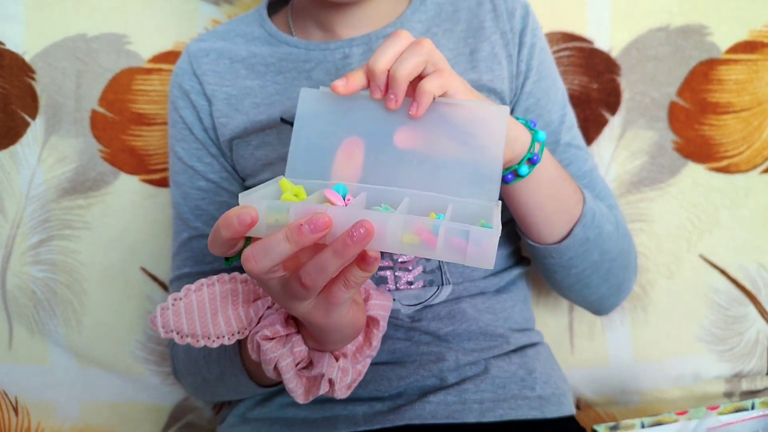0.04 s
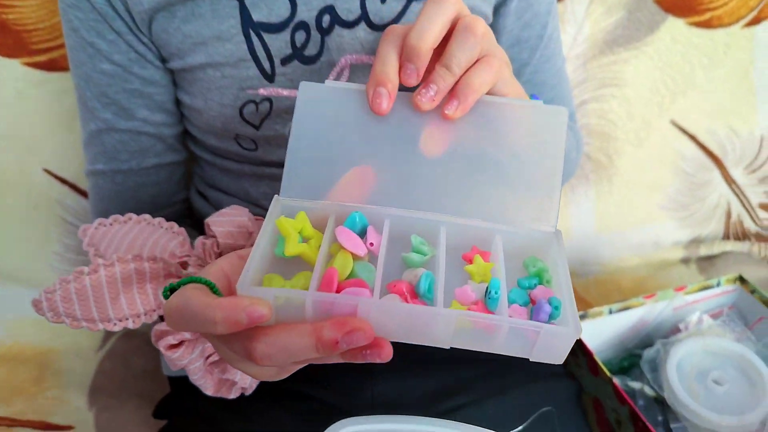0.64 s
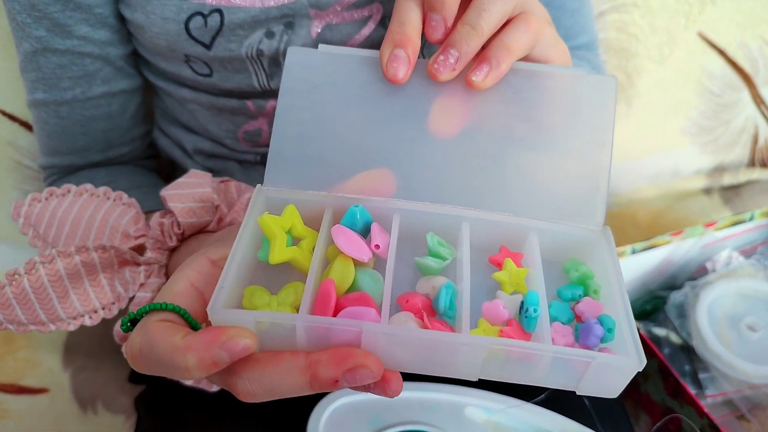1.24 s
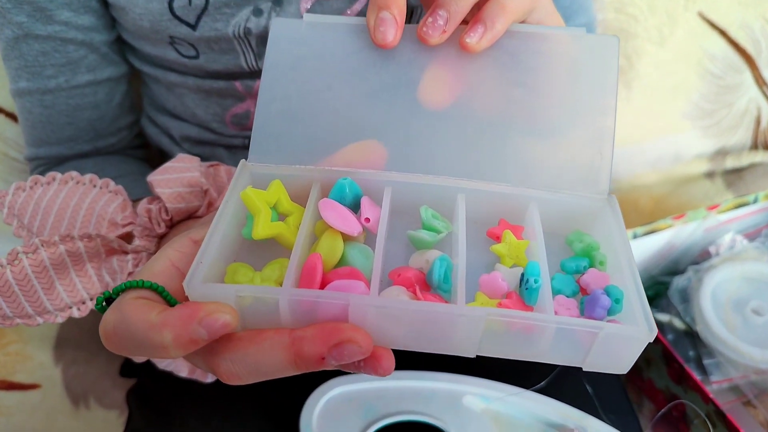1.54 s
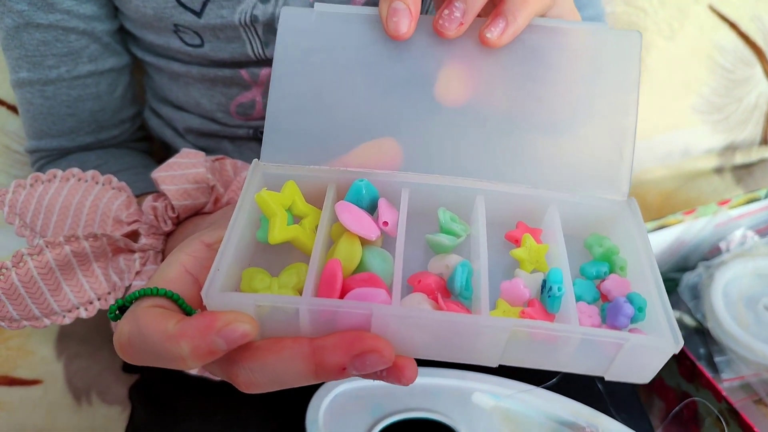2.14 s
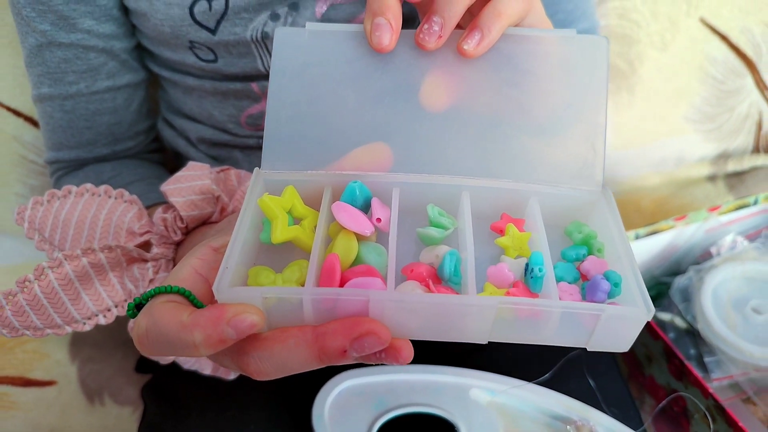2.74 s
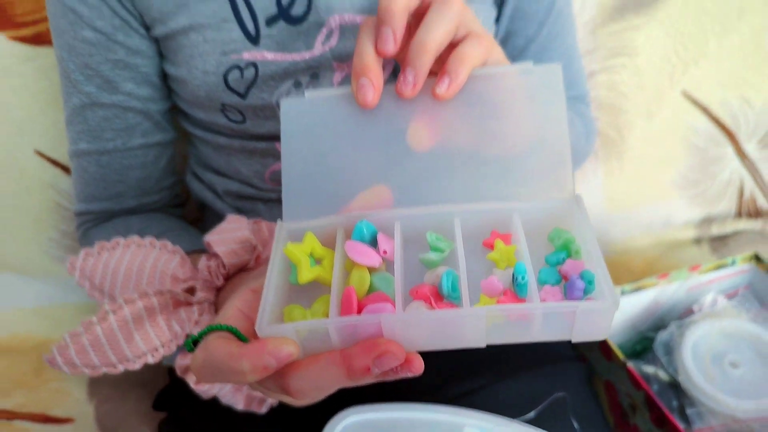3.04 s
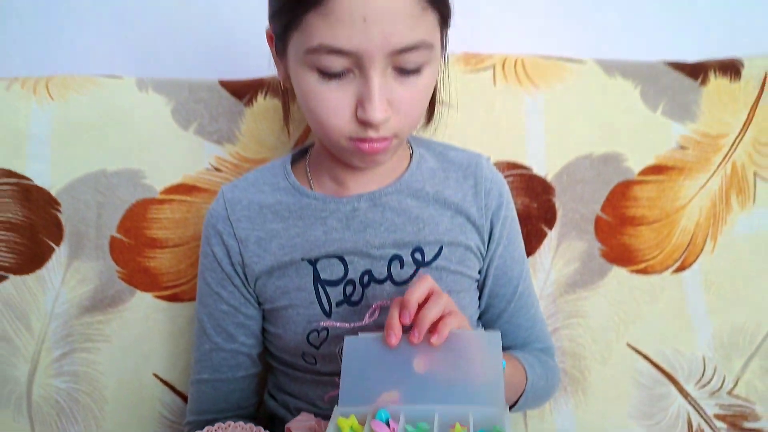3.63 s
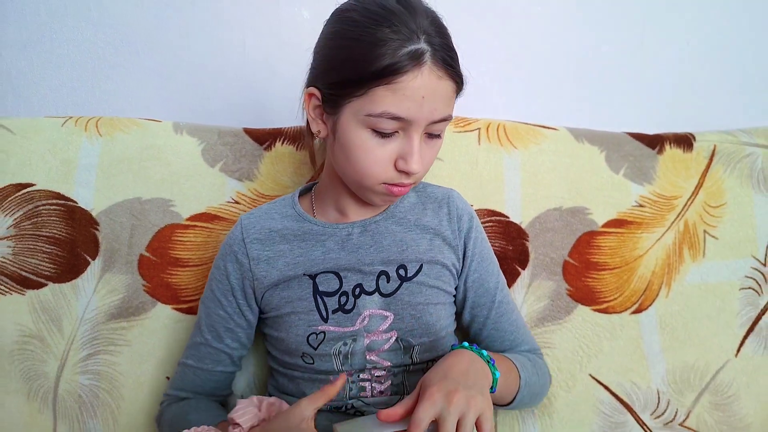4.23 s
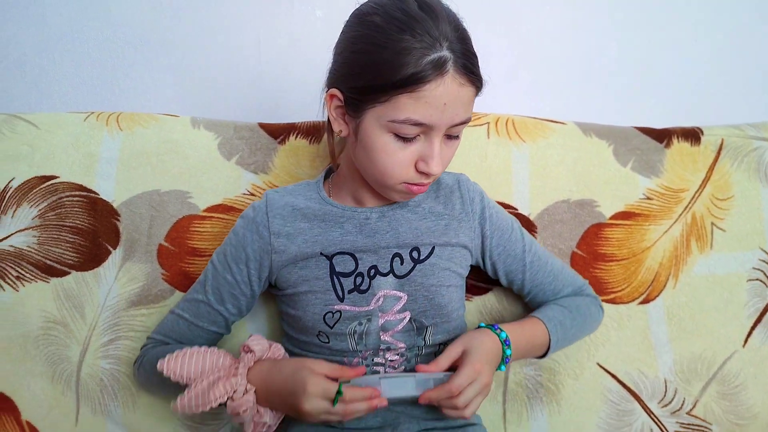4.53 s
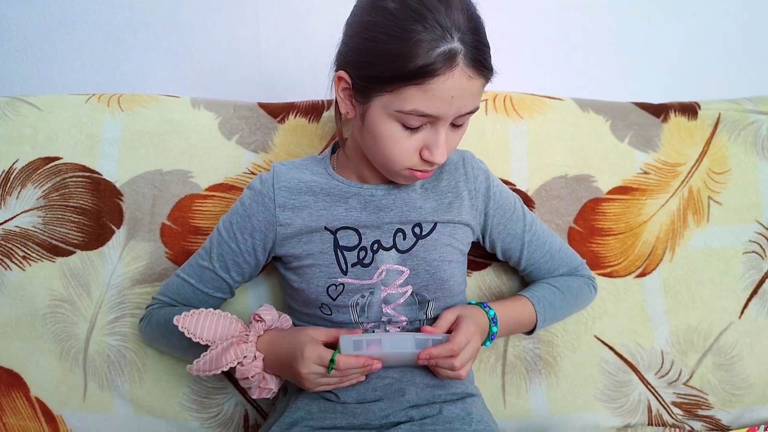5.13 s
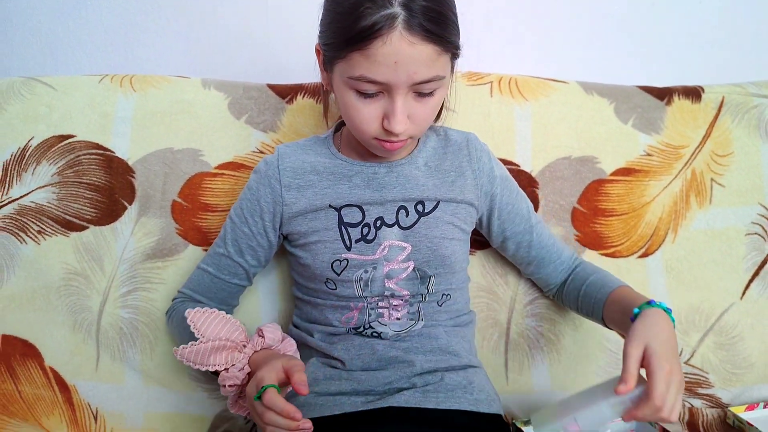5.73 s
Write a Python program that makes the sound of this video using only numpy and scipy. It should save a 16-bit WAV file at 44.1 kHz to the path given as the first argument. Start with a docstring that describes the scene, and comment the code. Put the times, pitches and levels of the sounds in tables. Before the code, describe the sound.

In a small quiet room, fingers tap lightly on a thin plastic box and softly bump the close, hand-held microphone. After a lull, beads click inside while hands and sleeves rub over the plastic. The lid knocks down and the catch shuts with a sharp snap, the loudest sound. A few hollow knocks, rustles and bead clicks follow, with a short bright echo over a faint hum.

```python
"""Bead box in a small quiet room

Close to a hand-held stereo microphone, a child shows a thin plastic compartment box of beads,
then closes it on her lap. Beads and fingernails tick on the shell, hands and sleeves slide over it,
the lid knocks down, its catch snaps shut and the box is swung aside. Fingers bump the microphone
early on. The room's walls give a short bright echo over a faint hum."""
import sys
import numpy as np
from scipy import signal
from scipy.fft import rfft, irfft
from scipy.io import wavfile
from scipy.ndimage import uniform_filter1d

SR = 44100
rng = np.random.default_rng(int(sys.argv[2]) if len(sys.argv) > 2 else 0)


def unload_wav(signal):
    """Save mono or channel-first audio to the path in sys.argv[1] as 16-bit WAV at rate SR, clipped to [-1, 1]."""
    wavfile.write(
        sys.argv[1],
        SR,
        np.round(np.clip(np.atleast_2d(signal).T, -1, 1) * 32767).astype(np.int16),
    )


N = 254757
TIME = np.arange(N) / SR

# the catch's snap: (time [s], level [dB], body re click [dB], pitch [Hz], left minus right [dB])
CATCH_SNAPS = [(4.8071, -12.5, -27.5, 4000, -4.5), (4.8089, -6, 0, 7400, 2),
               (4.8096, -12, -12.5, 2274, -10)]
def catch_snap():
    """The catch slips over its ridge, slams home and rebounds: the loudest thing at the microphone."""
    return box_contacts([(*row, 1) for row in CATCH_SNAPS], rise_s=.0001, crack_t60=.012, reach=1.7,
                        ring_db=-4.5, spot_db=-12.5, edge_db=2.5,
                        body_db=-4.5, body_band_hz=(200, 2000), gain_db=-26.5)


# knocks: (time [s], level [dB], body re click [dB], pitch [Hz], grip's shift of body modes [ratio])
LID_KNOCKS = [(4.6073, -28.5, 1.5, 1400, 1.2), (4.6416, -21.5, 2, 3250, 1.035),
              (5.060, -49, 0.5, 1770, .85), (5.101, -47, 3.5, 1500, 0.86), (5.160, -51.5, 9, 1500, 0.71),
              (5.4485, -52.5, 10, 1330, 0.76), (5.458, -49, 5.5, 1500, .85),
              (5.498, -37.5, -1.5, 1330, 0.94), (5.5035, -29, -2, 1500, 0.94),
              (5.517, -44.5, 6, 1500, 0.96), (5.529, -35.5, -2.5, 2130, 0.98)]
def lid_knocks():
    """The lid is pressed onto the tray, then the hand knocks the shut box, a little to the right."""
    rows = [(s, db, hollow_db, hz, -3, grip) for s, db, hollow_db, hz, grip in LID_KNOCKS]
    return box_contacts(rows, rise_s=.00083, crack_t60=.019, reach=2.02,
                        ring_db=-2, spot_db=-4.5, edge_db=-10,
                        body_db=3.5, body_band_hz=(560, 935), gain_db=-27)


# beads colliding: (time [s], level [dB], pitch [Hz])
BEAD_CLICKS = [(3.3513, -36, 6600), (3.3914, -36, 2720), (3.4156, -27, 5500), (3.495, -43, 4230),
               (3.5756, -44, 4000), (3.6072, -44, 3400), (3.659, -40.5, 5160), (3.684, -37, 4860),
               (3.7178, -34.5, 4300), (3.7696, -35.5, 3350), (3.8363, -37, 3550), (3.8900, -29, 5500),
               (3.9663, -44.5, 4800), (4.0639, -28.5, 7100), (4.1086, -27.5, 3850), (4.1599, -34.5, 1800),
               (4.297, -36.5, 1890), (4.363, -40.5, 2050), (5.0909, -45, 2800), (5.1415, -40.5, 3800),
               (5.1582, -36, 3970), (5.431, -48, 3310), (5.5963, -33, 2230), (5.6535, -32.5, 3000)]
def bead_clicks(hollow_db=-23, pan_db=-2.5):
    """Beads click against each other and the dividers, barely sounding the hollow body."""
    rows = [(s, db, hollow_db, hz, pan_db, 1) for s, db, hz in BEAD_CLICKS]
    return box_contacts(rows, rise_s=.00033, crack_t60=.028, reach=1.78,
                        ring_db=-1.5, spot_db=-5, edge_db=-6,
                        body_db=4.5, body_band_hz=(340, 1500), gain_db=-25.5)


# taps on the shell: (time [s], level [dB], body re click [dB], pitch [Hz], left minus right [dB])
FINGER_TAPS = [(0.0397, -45, -7, 3600, -4), (0.052, -52.5, 3, 2030, -8), (0.0816, -43.5, -3.5, 2300, 0),
               (0.0997, -30, -18, 2000, -2), (0.1170, -41.5, -12, 2520, -5), (0.199, -49, -20, 4000, -5),
               (0.2830, -51.5, -10, 2620, -5), (0.4797, -52.5, -2.5, 2580, -5),
               (0.7949, -47.5, 0.5, 1710, -1), (0.815, -51, 0.5, 1570, -9), (0.833, -52.5, -18, 2800, -5),
               (0.9053, -53.5, 3, 1620, -3), (1.235, -57.5, 2.5, 1340, 0), (3.1382, -58, -10, 1820, 4),
               (3.308, -46.5, -7.5, 2780, 0), (3.3249, -42, -32, 1440, 1), (4.0292, -46, -32, 1490, -2)]
def finger_taps():
    """Fingers and nails tap the open box near the microphone."""
    return box_contacts([(*row, 1) for row in FINGER_TAPS], rise_s=.0005, crack_t60=.027, reach=2.14,
                        ring_db=-4, spot_db=-1.5, edge_db=-4,
                        body_db=-1, body_band_hz=(348, 1500), gain_db=-24.5)


# low modes of the hollow box: (frequency [Hz], t60 [s], level [dB])
BODY_MODES = [(283, 0.011, -2), (564, 0.099, -12.5), (665, 0.016, 7.5), (883, 0.017, 17),
              (1020, 0.045, -10.5), (1350, 0.072, 0.5)]
# modes of its thin walls: (frequency [Hz], width [Hz], level [dB])
WALL_MODES = [(2300, 220, -5), (3360, 84, -14.5), (4070, 570, -5), (4610, 120, 3), (5550, 110, -29),
              (5740, 140, -18), (7300, 190, 11.5), (8960, 130, -10)]
# spectrum of a plastic crack, with the microphone's bright presence peak: (frequency [Hz], level [dB])
CRACK_AT_MIC = [(200, -11), (900, -16), (1700, -0.5), (2300, -3.5), (2900, -3), (4000, 0), (5600, 0),
                (6500, 2), (7300, 9), (8300, -0.5), (10500, -5), (14000, -4)]
def box_contacts(rows, rise_s, crack_t60, reach, ring_db, spot_db, edge_db,
                 body_db, body_band_hz, gain_db, size=4096):
    """Contacts crack and ring the box's walls and body; returns the paths to microphone and room."""
    paths = np.zeros((2, 2, N + size))
    t = np.arange(size) / SR
    contact = (1 - np.exp(-t / rise_s)) * fade(t, crack_t60)
    hand_damping = fade(t, .012)
    impulse = np.ones((2, 1)) * (t == 0)
    scattered = unit(colour(impulse, CRACK_AT_MIC))  # over all directions, the wall peaks even out
    for s, db, hollow_db, hz, pan_db, grip in rows:
        detune = 1 + .02 * rng.standard_normal()
        walls = sum(undb(mode_db) * np.exp(-np.pi * width * t)
                    * np.sin(2 * np.pi * (f * detune * t + rng.random()))
                    for f, width, mode_db in WALL_MODES)
        burst = unit(colour(alike(noise(size), .45) * contact, CRACK_AT_MIC))
        direct = burst + undb(ring_db) * unit(walls * hand_damping)
        spot = unit(np.sin(2 * np.pi * hz * t) * np.exp(-hz * t / 2.7))  # the struck spot rings briefly
        body = sum(undb(mode_db) * fade(t, t60) * np.sin(2 * np.pi * f * grip * detune * t)
                   for f, t60, mode_db in BODY_MODES)
        body = highpass(body, body_band_hz[0], order=4)  # a small box radiates little bass
        body = undb(hollow_db + body_db) * unit(lowpass(body, body_band_hz[1]))
        start = int(s * SR)
        for path, crack in zip(paths, (direct, scattered)):
            # a harder, shorter contact shifts the click upwards; a thin sharp edge is always there
            click = unit(highpass(lowpass(crack, reach * hz), .4 * hz))
            edge = highpass(undb(edge_db) * crack + undb(spot_db) * spot, hz / 4)
            hit = panned(pan_db) * unit(click + edge) + body
            path[:, start:start + size] += undb(db + gain_db) * hit
    return paths[:, :, :N]


# spectra of the bright friction and the dull scrape: (frequency [Hz], level [dB])
HISS_SPECTRUM = [(240, -52), (400, -31.5), (793, -25), (842, -4), (1100, -8), (1640, -12), (1800, -10.5),
                 (2420, -6), (3670, 2), (4130, -0.5), (4940, 0.5), (6000, -5), (7280, 2.5), (9650, -30),
                 (14000, -19)]
SCRAPE_SPECTRUM = [(250, -20), (700, -5.5), (1500, -7), (2300, -9), (3500, -10), (7000, -36)]
def hand_slides(lid_from_s=4.02, lid_shut_s=4.6):
    """Skin and sleeve rub the box in dense tiny slips, with small clinks and a duller scrape beneath."""
    level, scrape_level = stroke_levels()
    friction = unit(slips(rate=3700, spread_db=6.5) * undb(2 * wander(140)))
    # each small contact rings briefly at a pitch of its own
    clinks = unit(sum(signal.lfilter(*signal.iirpeak(hz, 16, fs=SR), slips(rate=160, spread_db=3))
                      for hz in np.geomspace(1400, 12000, 24)))
    hiss = unit(colour(friction + undb(4) * clinks, HISS_SPECTRUM)) * panned(-4)
    force = level / undb(-43)  # 1 in a firm slide; the fine sizzle grows faster than the rest
    sizzle = undb(-52) * unit(highpass(clinks, 8500, order=4)) * force ** 1.6
    scrape = undb(-3) * unit(colour(slips(rate=2700, spread_db=3), SCRAPE_SPECTRUM))
    # while the lid is lowered the scrape sounds through the gap under it
    closing = (TIME > lid_from_s) & (TIME < lid_shut_s)
    scrape = np.where(closing, lid_gap() + undb(-5.5) * scrape, scrape)
    return level * hiss + sizzle + scrape_level * scrape


# strokes over the box: (start [s], swell [s], hold [s], level [dB], scrape re stroke [dB])
HAND_STROKES = [(0.114, 0.011, 0.21, -73.5, 7), (3.338, 0.064, 0.012, -47, -12.5),
                (3.443, 0.013, 0.18, -68, -3.5), (3.705, 0.011, 0.095, -52, -8),
                (3.875, 0.0089, 0.0034, -50, -7), (3.954, 0.029, 0.077, -71.5, -3),
                (4.043, 0.005, 0.0093, -49, -10.5), (4.059, 0.0046, 0.11, -45, -9.5),
                (4.199, 0.027, 0.047, -53, -10), (4.42, .016, 0.022, -48, -7.5), (4.507, .025, .02, -67, 5),
                (5.134, 0.018, 0.0087, -63.5, 6), (5.446, 0.0091, 0.028, -67.5, 5.5),
                (5.495, 0.0089, 0.036, -50.5, 1.5), (5.586, 0.0054, 0.028, -50, -5),
                (5.624, 0.013, 0.17, -50, -4)]
def stroke_levels(swell_db=16.5, sag_db_per_s=46.5, release_db_per_s=262):
    """Levels of the slide and its scrape: each stroke swells, sags as the hand slows and dies away."""
    level, scrape_level = np.zeros((2, N))
    for start, swell_s, hold_s, db, scrape_db in HAND_STROKES:
        t = TIME - start - swell_s
        swell = swell_db * np.minimum(t / swell_s, 0)
        sag = sag_db_per_s * np.clip(t, 0, hold_s)
        release = release_db_per_s * np.maximum(t - hold_s, 0)
        stroke = undb(db + swell - sag - release) * (TIME >= start)
        level += stroke
        scrape_level += undb(scrape_db) * stroke
    return level, scrape_level


def slips(rate, spread_db):
    """Friction's random impulses, about `rate` a second, mostly small with a few large ones."""
    sizes = undb(spread_db * np.minimum(rng.exponential(size=N), 3.5))
    return alike(noise() * (rng.random(N) < rate / SR) * sizes, .43)


def lid_gap(wide_hz=1475, narrow_hz=1078, mid_fall_s=4.118):
    """Two unevenly stirred air resonances under the lid fall together as the gap narrows."""
    openness = (1 - np.tanh((TIME - mid_fall_s) / .036)) / 2
    hz = (narrow_hz + (wide_hz - narrow_hz) * openness) * (1 + .04 * wander(30))
    cavity = narrow_noise(hz, width_hz=250) * undb(4.3 * wander(45))
    overtone = narrow_noise(1.68 * hz, width_hz=170) * undb(2.5 * wander(41))
    return undb(-2.5) * (cavity + undb(-2) * overtone)


# housing taps: (time [s], level [dB], push width [s], click re push [dB], left minus right [dB])
MIC_BUMPS = [(0.0794, -45, 0.00024, -16, -8), (0.2083, -45, 0.00066, -24, -30),
             (0.2287, -29, 0.0005, -17, -28), (0.578, -40.5, 0.0003, -8, -22),
             (1.0182, -49.5, 0.00017, 2, 8)]
# spectrum of the housing's click: (frequency [Hz], level [dB])
HOUSING_SPECTRUM = [(300, -7.5), (900, 3), (1450, 0), (3500, -11.5), (8000, -19), (14000, -41)]
def microphone_bumps():
    """A finger taps the microphone housing: one soft push with a slow undershoot, and a dry click."""
    pushes, click_level = np.zeros((2, 2, N))
    for s, db, push_s, click_db, pan_db in MIC_BUMPS:
        t = TIME - s
        gains = undb(db) * panned(pan_db)
        pushes += gains * np.exp(-(t / push_s) ** 2)
        click_level += gains * undb(click_db) * fade(np.abs(t), t60=.012) * (t > 0)
    housing = unit(colour(alike(noise(), .45), HOUSING_SPECTRUM))
    return highpass(pushes, 40) + click_level * housing


# feed to the room, least while the box is close to the microphone: (time [s], level [dB])
ROOM_FEED = [(.1, 0), (.55, -1.5), (3.0, 0), (3.5, 0), (5.78, 3.5)]
# colour of the echo: (frequency [Hz], level [dB])
ECHO_SPECTRUM = [(100, -18), (300, -0.5), (800, -3.5), (1700, 3), (3000, 5), (7500, -4.5), (14000, -2.5)]
def room_echo(x, t60=.29, treble_t60=.25, gap_s=.0051, size=22050):
    """The near walls answer after a short gap with a diffuse tail whose treble dies first."""
    feed = x * undb(np.interp(TIME, *np.transpose(ROOM_FEED)))
    t = np.arange(size) / SR
    low = colour(alike(noise(size), .53), [(1500, 2.5), (5000, -7)]) * fade(t, t60)
    treble = colour(noise(size), [(1500, -19), (5000, 4)]) * fade(t, treble_t60)
    onset = np.interp(t, [.002, gap_s, gap_s + .0055], [.3, .5, 1])
    tail = unit((low + treble) * onset) / np.sqrt(size)
    return undb(-5) * signal.fftconvolve(feed, colour(tail, ECHO_SPECTRUM), axes=1)[:, :N]


# spectrum of the room's air: (frequency [Hz], level [dB])
AIR_SPECTRUM = [(13, -23.5), (22, -2.5), (43, -17), (76, -17), (103, -18), (158, -16), (186, -20),
                (279, -23), (310, -29.5), (337, -24.5), (375, -28.5), (844, -34), (966, -35), (8380, -47),
                (14000, -49)]
# rumble as the microphone is moved: (time [s], level [dB])
HANDLING_RUMBLE = [(0, -62), (.6, -78), (2.4, -66.5), (3.5, -60.5), (5.78, -58)]
def room_tone():
    """Quiet room air, a wavering appliance hum and the rumble of the hand-held microphone."""
    air = undb(-65.5) * unit(colour(alike(noise(), .12), AIR_SPECTRUM))
    hum = undb(-73) * narrow_noise(157, width_hz=7.9)
    rumble_spectrum = [(10, -13), (25, 2), (50, -12), (110, -24.5), (300, -36.5), (1000, -73.5)]
    rumble = unit(colour(alike(noise(), .32), rumble_spectrum))
    handling = undb(np.interp(TIME, *np.transpose(HANDLING_RUMBLE)) + .5)
    return highpass(air + rumble * handling, 21) + hum


def port_lag(pair, samples=2):
    """Direct sound reaches the microphone's right port a moment after the left."""
    return np.array([pair[0], np.pad(pair[1], (samples, 0))[:-samples]])


def undb(db):
    return 10 ** (np.asarray(db) / 20)


def unit(x):
    return x / np.sqrt(np.mean(x ** 2))


def noise(n=N):
    return rng.standard_normal((2, n))


def fade(t, t60):
    return np.exp(-np.log(1000) * t / t60)


def panned(db):
    """Left and right gains for a level difference."""
    gains = undb(np.array([db, -db]).reshape(2, -1) / 2)
    return gains / np.sqrt(np.mean(gains ** 2, axis=0))


def alike(pair, likeness):
    """Two unrelated signals become left and right with the given likeness."""
    mid = np.sqrt(1 + likeness) * pair[0]
    side = np.sqrt(1 - likeness) * pair[1]
    return np.array([mid + side, mid - side]) / np.sqrt(2)


def colour(x, points, size=4096):
    """Minimum-phase filter through (frequency [Hz], level [dB]) points."""
    hz, db = np.transpose(points)
    grid = np.maximum(np.fft.rfftfreq(size, 1 / SR), 1)
    gains = undb(np.interp(np.log(grid), np.log(hz), db))
    cepstrum = irfft(np.log(gains))
    cepstrum[1:size // 2] *= 2
    cepstrum[size // 2 + 1:] = 0
    response = irfft(np.exp(rfft(cepstrum)))
    return signal.fftconvolve(x, response[None], axes=1)[:, :x.shape[1]]


def lowpass(x, hz):
    return signal.sosfilt(signal.butter(2, min(hz, .45 * SR), fs=SR, output="sos"), x)


def highpass(x, hz, order=2):
    return signal.sosfilt(signal.butter(order, min(hz, .45 * SR), "high", fs=SR, output="sos"), x)


def narrow_noise(hz, width_hz):
    """A randomly driven resonance whose centre may move."""
    a, b = lowpass(noise(), width_hz / 2)
    phase = 2 * np.pi * np.cumsum(hz + np.zeros(N)) / SR
    return unit(a * np.cos(phase) + b * np.sin(phase))


def wander(rate_hz):
    """Smooth random drift with a spread near 1."""
    step = int(SR / rate_hz)
    stairs = np.repeat(rng.standard_normal(N // step + 1), step)
    return unit(uniform_filter1d(stairs, step)[:N])


def scene():
    """The box at the microphone, direct and off the walls, with handling bumps and room tone."""
    direct, scattered = finger_taps() + bead_clicks() + lid_knocks() + catch_snap()
    rubbing = hand_slides()
    echo = room_echo(scattered + undb(-3.5) * rubbing)
    return port_lag(direct + rubbing) + echo + microphone_bumps() + room_tone()


def record(dry, top_hz=14500):
    """The recorder cuts the top treble steeply."""
    return signal.sosfilt(signal.ellip(8, .2, 70, top_hz, fs=SR, output="sos"), dry)


dry = scene()
out = record(dry)
unload_wav(out)
```